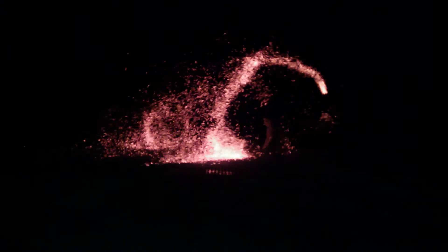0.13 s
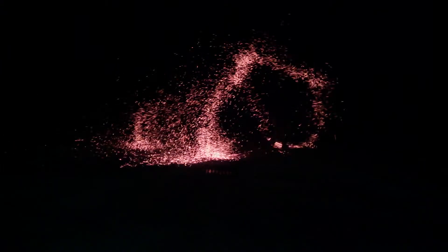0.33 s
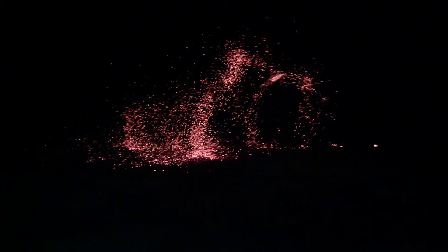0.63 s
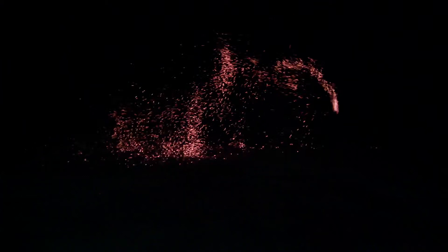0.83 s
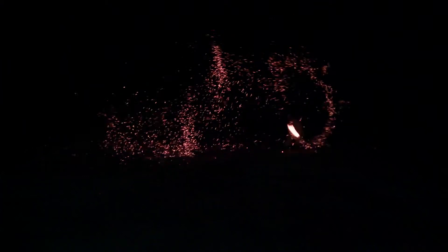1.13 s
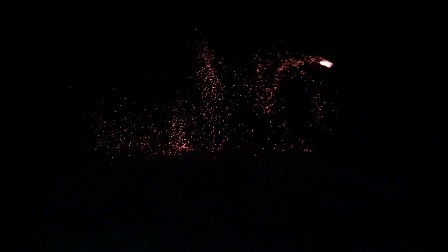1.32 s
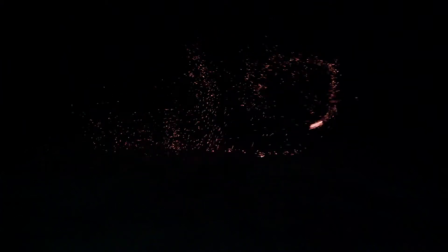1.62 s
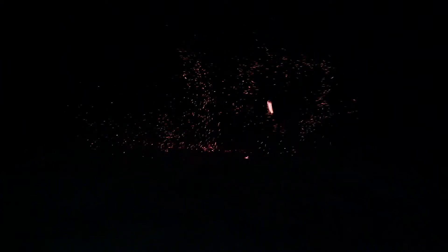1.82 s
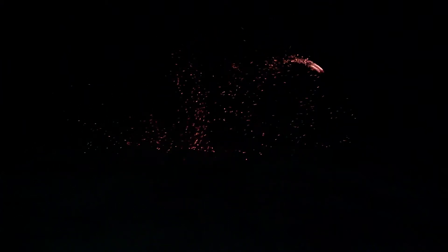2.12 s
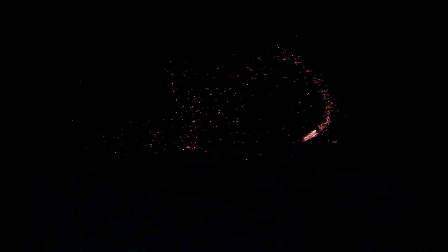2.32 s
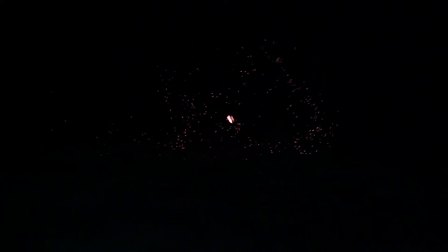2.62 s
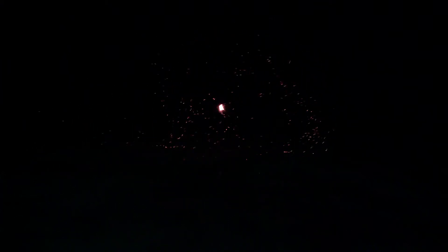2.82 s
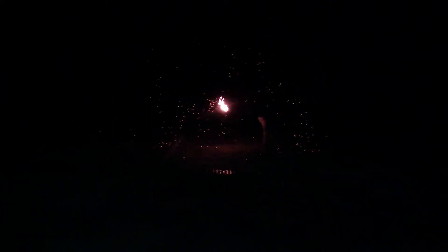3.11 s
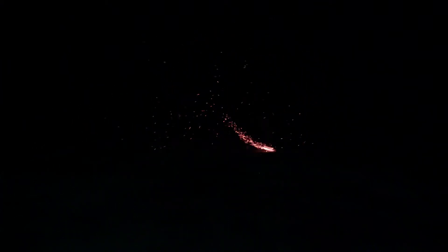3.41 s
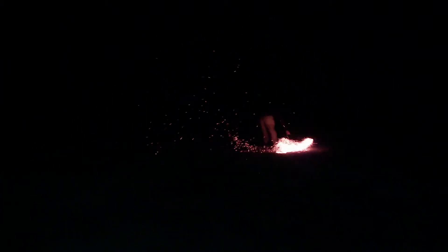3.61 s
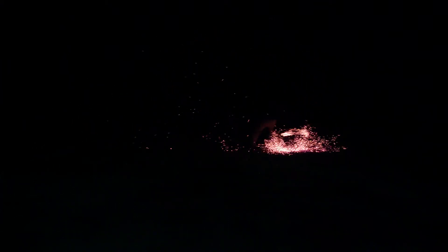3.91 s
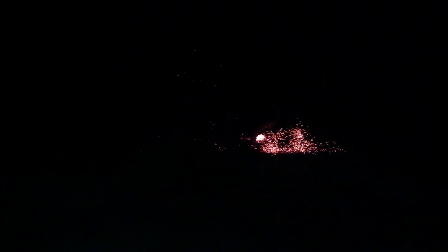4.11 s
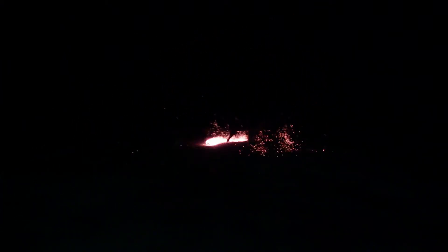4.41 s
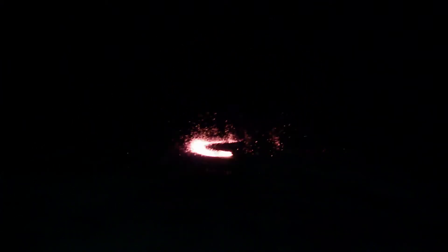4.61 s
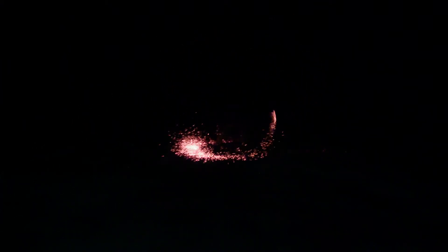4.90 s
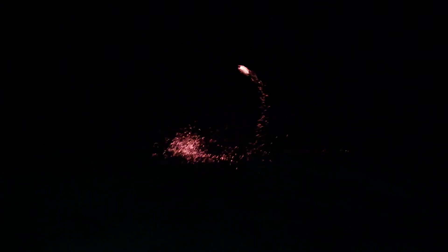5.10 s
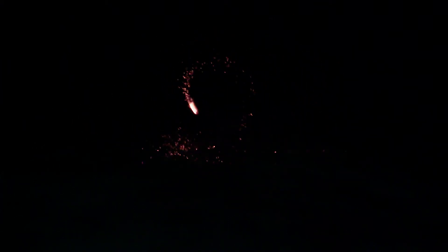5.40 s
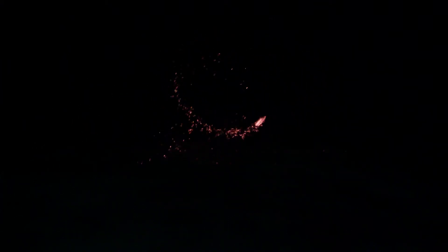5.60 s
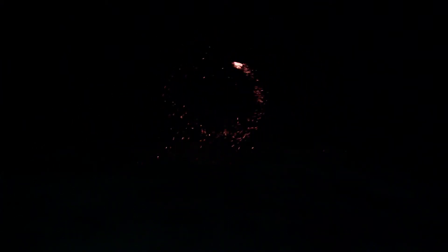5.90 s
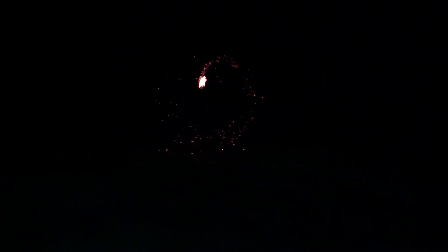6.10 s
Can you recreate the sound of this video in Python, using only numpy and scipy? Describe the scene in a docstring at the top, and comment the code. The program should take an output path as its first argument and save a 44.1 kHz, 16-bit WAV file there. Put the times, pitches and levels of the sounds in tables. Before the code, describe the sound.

A swung ember cage on a chain: fizzing sparks die away, bright chinks quicken, then hot crackle, harsh ground scrapes and loose snaps.

```python
"""Outdoors at night, a cage of burning embers is swung on a chain and dragged over the ground.
Links chink as short bursts of decaying tones, and metal slides as shaped streams of tiny impacts.
Embers hiss and snap, the cage scrapes through grit and shoes scuff the earth, all as short bursts.
Faint insects, a distant wash and a little wind are filtered noise in the background."""
import sys
import numpy as np
from scipy import signal
from scipy.io import wavfile
from scipy.ndimage import uniform_filter1d

SR = 44100
rng = np.random.default_rng(int(sys.argv[2]) if len(sys.argv) > 2 else 0)


def output_pcm(signal):
    """Save a mono or channel-first signal as 16-bit PCM at the path in sys.argv[1].

    Samples are clipped to [-1, 1] before scaling.
    """
    pcm = np.clip(np.atleast_2d(signal).T, -1, 1) * 32767
    wavfile.write(sys.argv[1], SR, np.round(pcm).astype(np.int16))


N = 277609
TIME = np.arange(N) / SR  # the clock [s]


# ringing tones of the small links, damped by their neighbours:
# (frequency [Hz], level [dB], time to fall by 60 dB [s])
LINK_TONES = [(5150, -4.5, 0.061), (6793, 7.5, 0.032), (6940, 12, 0.034), (7120, 6, 0.073),
              (7900, -26, 0.031), (12300, -13.5, 0.025), (14900, -17, 0.015)]
# colour of metal rubbing on metal: (frequency [Hz], level [dB per Hz])
STEEL_COLOUR = [(400, -34), (1500, -18.5), (1950, -9), (2400, -13.5), (2900, -13.5), (3400, -13),
                (3750, -21), (4200, -11), (5100, -1.5), (6000, -7), (7000, 1.5), (8700, 1), (10500, -1),
                (12200, 4), (13800, -5), (15500, 0)]
# jerks of the chain: (time [s], length [s], chink level [dB], main chink frequency [Hz],
# slide level of metal over metal [dB], before a 0.25 dB lift in the chain)
JERKS = [(0.056, .019, -41, 7130, -41), (0.098, .034, -35, 6960, -37.5), (0.204, .03, -27, 7070, -40.5),
         (0.317, 0.027, -36, 6800, -45), (0.44, 0.011, -27, 7150, -37.5),
         (0.581, 0.0084, -42.5, 6700, -45.5), (0.632, 0.0086, -37.5, 6730, -43),
         (0.671, 0.0067, -40, 7050, -50), (0.707, 0.059, -69, 7000, -46.5), (0.781, 0.018, -67, 7000, -49),
         (0.86, .026, -53, 7140, -53), (1.386, .002, -44, 6780, -73), (1.424, 0.014, -64, 7000, -54),
         (1.46, 0.023, -46, 6860, -37.5), (1.5, 0.022, -63, 7000, -42), (1.541, .007, -41, 7040, -41),
         (1.629, 0.0066, -59, 7000, -43.5), (1.678, 0.022, -42, 6800, -48.5),
         (1.751, .011, -33, 7270, -42.5), (1.769, 0.032, -55, 7000, -41.5), (1.843, 0.0067, -44, 7040, -54),
         (1.923, .036, -34, 6600, -35.5), (1.98, 0.01, -41.5, 7100, -39.5),
         (2.065, 0.0087, -41.5, 6860, -46), (2.095, 0.023, -52, 6950, -43.5),
         (2.131, 0.0073, -37.5, 6930, -44), (2.214, 0.038, -31, 7240, -41),
         (2.31, .006, -36.5, 7110, -42.5), (2.389, 0.032, -32.5, 7150, -36.5),
         (2.476, 0.0043, -31.5, 7100, -41), (2.539, 0.038, -34, 7300, -40), (2.623, 0.0069, -27, 7040, -41),
         (2.702, .009, -35, 6600, -45), (2.731, 0.012, -42, 6980, -35), (2.75, 0.0037, -24.5, 6950, -47),
         (2.765, 0.013, -35, 7050, -48), (2.798, 0.0086, -26, 7050, -39.5), (2.848, 0.0075, -42, 7000, -40),
         (2.879, 0.0062, -24.5, 7100, -36.5), (2.892, 0.021, -32, 6950, -41.5),
         (2.952, 0.027, -49, 7100, -43), (2.985, 0.011, -35, 7070, -49), (3.035, 0.037, -27, 7050, -35),
         (3.105, 0.0046, -25, 7100, -39.5), (3.12, 0.0058, -31, 6960, -40.5),
         (3.206, .05, -27, 7070, -33.5), (3.269, 0.0045, -22, 6860, -38), (3.287, 0.0032, -31, 7300, -58),
         (3.303, 0.0067, -31, 7100, -33.5), (3.324, .014, -35, 7030, -57), (3.382, 0.016, -34, 6700, -36),
         (3.403, .028, -29.5, 7160, -32), (3.471, 0.013, -28, 7000, -48), (3.53, 0.0095, -43, 6850, -57),
         (3.55, 0.0099, -33.5, 7080, -54), (3.575, 0.035, -36.5, 7260, -35),
         (3.641, 0.0079, -34.5, 6940, -38), (3.692, .035, -54, 7050, -49), (3.867, 0.036, -59, 7000, -50),
         (3.734, 0.028, -38.5, 7110, -35), (3.791, .004, -30.5, 7400, -41),
         (3.81, 0.0091, -34.5, 7300, -40), (3.934, 0.015, -36.5, 6700, -43),
         (3.958, 0.0058, -30.5, 6640, -49), (3.999, .004, -41.5, 6700, -52), (4.037, .004, -42, 6800, -50),
         (4.125, 0.056, -36.5, 7060, -38.5), (4.208, 0.02, -32, 6950, -37), (4.267, 0.012, -36, 7100, -41),
         (4.309, 0.052, -35.5, 7130, -34.5), (4.404, 0.022, -37.5, 7000, -39.5),
         (4.488, 0.045, -35, 7200, -39), (4.548, .01, -38.5, 7140, -38), (5.1, 0.0056, -58, 7000, -38.5),
         (5.197, .006, -60, 7000, -45.5), (5.277, 0.037, -71, 7000, -51.5), (5.323, 0.02, -48, 6800, -52),
         (5.341, 0.0048, -69, 7000, -47), (5.451, 0.11, -61, 6900, -58), (5.553, 0.025, -59, 6750, -41),
         (5.634, 0.027, -64, 7000, -55), (5.695, 0.0085, -52.5, 6890, -52)]
# direct strikes on the large rings: (time [s], length [s], level [dB], main frequency [Hz])
RING_STRIKES = [(0.105, .034, -36.5, 10000), (0.197, .033, -37, 9300), (0.638, .008, -40, 8500),
                (0.671, 0.0057, -37.5, 8970), (1.541, .007, -39.5, 8540), (2.799, 0.0074, -31, 8520),
                (3.041, 0.02, -32, 8540), (3.106, .004, -33.5, 10010), (3.209, 0.061, -38, 8980),
                (3.306, .007, -31.5, 8700), (3.393, 0.031, -28.5, 8420), (3.547, 0.012, -36, 10100),
                (3.745, 0.015, -31, 9850), (3.803, 0.02, -43.5, 9030), (3.956, 0.0061, -34.5, 9400),
                (4.13, 0.026, -37, 9800), (4.264, 0.012, -28, 8530), (4.306, 0.056, -38, 9800),
                (4.495, 0.03, -36.5, 8980), (4.544, 0.011, -37.5, 9880)]


def chain():
    """Each jerk rattles the small links, stirs the large rings and drags metal over metal."""
    out = np.zeros(N)
    for start, length, db, hz, _ in JERKS:
        chink = jingle(length, LINK_TONES, hz, favour_db=8, contacts_per_s=300, detune=0.009)
        add(out, start, amp(db) * chink)
        # the rings sound 19 dB below the chink
        add(out, start, amp(db - 19) * rings(length, RING_TONES[0][0]))
    for start, length, db, hz in RING_STRIKES:
        add(out, start, amp(db) * rings(length, hz))
    start, length, *_, slide_db = np.transpose(JERKS)
    # the chain slides on 8.1 ms after the links have met, then the last links settle
    slide = strokes(start, length + 0.0081, slide_db + 0.25, fall=0.026, tail_db=-16, tail=0.04)
    rubbing = patchy(grains(per_s=16000, spread_db=2.0), depth_db=3.0)
    rubbing = rubbing * flutter(rate=220, depth_db=3.0)
    return out + colour(slide * rubbing, STEEL_COLOUR)


# ringing tones of the large rings, which hang freer:
# (frequency [Hz], level [dB], time to fall by 60 dB [s])
RING_TONES = [(8533, -5, 0.11), (9010, 1.5, 0.049), (9750, -8, 0.07), (10040, -0.5, 0.067),
              (10220, -5.5, 0.035)]


def rings(length, main_hz):
    """The large rings meet less often than the links and almost keep their pitch."""
    return jingle(length, RING_TONES, main_hz, favour_db=10, contacts_per_s=140, detune=0.0016)


# hardest knocks of the chain: (time [s], peak level of the ping's envelope [dB], frequency [Hz])
CLACKS = [(.2065, -24, 7200), (.675, -31, 7100), (1.544, -22, 6950), (2.8058, -19, 6840),
          (3.2679, -9.5, 6610)]


def clacks(swell=0.00066, spray_db=-11, spray_fall=0.0012):
    """The chain snaps taut: steel meets steel in one hard, very short ping with a bright edge."""
    pings, spray = np.zeros(N), np.zeros(N)
    t = np.arange(SR // 100) / SR
    for start, db, hz in CLACKS:
        envelope = t / swell * np.exp(1 - t / swell)  # reaches its peak of 1 at swell [s]
        add(pings, start, amp(db) * envelope * np.sin(2 * np.pi * hz * t))
        edge = np.exp(-t / spray_fall) * rng.standard_normal(len(t))
        add(spray, start, amp(db + spray_db) * edge)
    return pings + colour(spray, STEEL_COLOUR)


# ringing tones of the cage: (frequency [Hz], level [dB], time to fall by 60 dB [s])
CAGE_TONES = [(1895, -4.5, 0.16), (2030, -5, 0.048), (2270, 0, 0.053), (2947, -9, 0.056),
              (5450, 11.5, 0.04), (5330, -7.5, 0.023)]
# the cage swings hard against its chain: (time [s], length [s], level [dB])
CLATTERS = [(1.425, 0.018, -50), (1.463, 0.005, -39.5), (1.5, 0.047, -53.5), (1.78, 0.05, -50),
            (3.212, 0.018, -48)]


def cage():
    """The cage knocks against its chain: lightly at every jerk, now and then on its own account."""
    out = np.zeros(N)
    # light knocks lie 22 dB below the listed slide level
    light = [(start, length, slide_db - 22) for start, length, *_, slide_db in JERKS]
    for start, length, db in list(CLATTERS) + light:
        knock = jingle(length, CAGE_TONES, 0, 0, contacts_per_s=320, detune=0.02)
        add(out, start, amp(db) * knock)
    return out


# colour of the sparks: (frequency [Hz], level [dB per Hz])
SPARK_COLOUR = [(470, -55), (800, -35), (953, -23), (1080, -29), (1700, -17.5), (2910, -7), (4990, 0.5),
                (5510, -3.5), (6910, 2.5), (12000, 0.5), (16000, -2)]


def shower():
    """Sparks fizz as a dense stream of tiny impacts that holds, then burns out."""
    start_db, hold_s, fade_db_per_s, last_db = -38.5, 0.25, 38.5, -82.5
    fade_db = start_db - fade_db_per_s * np.maximum(TIME - hold_s, 0)
    fizz = patchy(grains(per_s=8700, spread_db=4.5), depth_db=-0.5)
    fizz = fizz * flutter(rate=120, depth_db=3.5)
    return colour(amp(np.maximum(fade_db, last_db)) * fizz, SPARK_COLOUR)


# the coals as the swing and the ground stir them: (time [s], level [dB]),
# before the crackle's lift of 3 dB and the stray sparks' cut of 8.5 dB
COALS = [(0.0, -51.5), (0.33, -55), (0.46, -65), (1.3, -78.5), (1.47, -82), (1.66, -60), (2.26, -70),
         (3.35, -74), (3.66, -57), (3.9, -65.5), (4.17, -65.5), (4.29, -54), (4.48, -50), (5.75, -67.5),
         (5.9, -85.5), (6.29, -69)]
# grit rattling in the cage; also colours the coals and splinters: (frequency [Hz], level [dB per Hz])
GRIT_COLOUR = [(150, -50), (500, -25), (1150, -10), (1400, -3.5), (1750, -10), (2100, -3), (2450, -0.5),
               (2900, 3), (3600, -0.5), (4500, 0.5), (6000, -3.5), (9000, -11), (16000, -22)]


def coals():
    """Fanned coals crackle as sparser impacts; a few stray sparks tick along with them."""
    crackle = patchy(grains(per_s=2500, spread_db=3.8), depth_db=2.6)
    crackle = crackle * flutter(rate=70, depth_db=1.8)
    rush = amp(3) * level(COALS) * crackle
    # a faint floor keeps the stray sparks going when the coals are quiet
    strays = (amp(-84.5) + amp(-8.5) * level(COALS)) * grains(per_s=45, spread_db=3)
    return colour(rush, GRIT_COLOUR) + colour(strays, SPARK_COLOUR)


# embers bursting: (time [s], level [dB], centre frequency [Hz]); the crack peaks 2 dB above this level
SNAPS = [(0.4525, -24, 7200), (0.4806, -14, 10400), (0.7502, -20, 6170), (1.049, -37.5, 5900),
         (1.1393, -44, 5790), (1.259, -46, 6100), (4.0819, -30.5, 6800), (4.5734, -38, 3110),
         (4.804, -46, 4350), (4.814, -37, 3270), (4.8703, -33, 3170), (4.9152, -40, 4290),
         (5.1034, -14, 7400), (5.1416, -32, 6670), (5.1941, -26.5, 3930), (5.669, -32.5, 5040),
         (5.8175, -34, 5800)]


def snaps(cycles=0.6, splinter_db=-14, splinter_fall=0.0019):
    """An ember bursts: a pulse of about one cycle, then a short spray of splinters."""
    cracks, spray = np.zeros(N), np.zeros(N)
    t = np.arange(SR // 40) / SR
    for start, db, hz in SNAPS:
        push = np.sin(2 * np.pi * hz * t) * np.exp(-t * hz / cycles)
        pulse = np.diff(push, prepend=0)  # moves no net air
        add(cracks, start, amp(db + 2.0) * pulse / abs(pulse).max())
        splinters = np.exp(-t / splinter_fall) * rng.standard_normal(len(t))
        add(spray, start, amp(db + splinter_db) * splinters)
    return cracks + colour(spray, GRIT_COLOUR)


# the cage scrapes the ground: (time [s], length [s], grit level [dB] before a 1.2 dB lift of the stones,
# resonance [Hz], metal rasp level [dB])
SCRAPES = [(1.458, 0.029, -48.5, 3060, -53), (1.79, 0.064, -51.5, 1930, -61),
           (3.558, 0.003, -24.5, 3450, -29), (4.126, 0.0057, -39.5, 1430, -43),
           (4.272, 0.014, -54, 1390, -43), (4.306, 0.012, -41, 2620, -47), (4.347, 0.0065, -33, 4500, -42),
           (4.39, 0.018, -37.5, 3160, -34), (4.417, .011, -40, 5140, -43), (4.444, 0.013, -38, 4430, -21.5),
           (4.478, 0.0083, -31, 4340, -18.5), (4.599, 0.016, -31, 4690, -34),
           (4.633, 0.0051, -41.5, 4530, -44), (4.654, 0.0093, -37, 4230, -35.5),
           (4.803, 0.0021, -38, 4070, -48), (4.959, 0.018, -44, 5030, -73)]


def ground():
    """The dragged cage grinds grit, rasps and stirs the earth."""
    start, length, db, hz, rasp_db = np.transpose(SCRAPES)
    stones = accent(grit(), start, hz, width_hz=200, boost_db=1)
    stones = stones * strokes(start, length, db + 1.2, fall=0.0054, tail_db=-44, tail=0.019)
    rasp = colour(patchy(grains(per_s=13000, spread_db=-0.5), depth_db=5), STEEL_COLOUR)
    rasp = rasp * strokes(start, length, rasp_db, fall=0.0033, tail_db=-17, tail=0.016)
    # the earth lies 17 dB below the listed grit level and resonates at 1370 Hz
    stirred = earth(start, length, db - 17, np.full(len(start), 1370))
    return stones + rasp + stirred


def grit():
    """Small stones grinding together: a shifting stream of tiny impacts."""
    stones = patchy(grains(per_s=5100, spread_db=3.0), depth_db=4)
    return unit(colour(stones, GRIT_COLOUR))


# colour of scuffed earth: (frequency [Hz], level [dB per Hz])
EARTH_COLOUR = [(60, -44), (200, -37.5), (330, -13), (520, 3.5), (650, 1.5), (950, 4), (1180, -6),
                (1420, 4), (1700, -15), (5000, -22)]


def earth(start, length, db, hz):
    """Strokes through soft earth, each with a hollow resonance."""
    noise = colour(rng.standard_normal(N), EARTH_COLOUR)
    noise = accent(noise, start, hz, width_hz=93, boost_db=9)
    return noise * strokes(start, length, db, fall=0.006, tail_db=-8.0, tail=0.063)


# feet scuff the earth: (time [s], length [s], level [dB], resonance [Hz])
SCUFFS = [(0.233, 0.016, -51, 860), (0.405, 0.049, -56.5, 430), (0.963, 0.041, -51, 645),
          (1.246, 0.0079, -52, 950), (1.638, 0.017, -49.5, 990), (1.781, 0.11, -55, 690),
          (2.468, 0.039, -52, 1000), (2.528, 0.1, -58, 474), (2.801, 0.025, -43, 890),
          (3.47, 0.018, -43.5, 980), (4.276, 0.03, -45, 1350), (4.344, .009, -42, 1340),
          (4.948, 0.024, -47, 706), (6.27, .029, -53, 1000)]


def scuffs():
    """Shoes rub over earth and a little grit, which lies 7 dB below the earth."""
    start, length, db, hz = np.transpose(SCUFFS)
    stones = grit() * strokes(start, length, db - 7, fall=0.005, tail_db=-24, tail=0.02)
    return earth(start, length, db, hz) + stones


# dull footfalls: (time [s], level [dB], length [s])
STEPS = [(0.834, -44.5, 0.0083), (0.93, -59, 0.021)]
# colour of a sole landing: (frequency [Hz], level [dB per Hz])
SOLE_COLOUR = [(30, -24), (90, 2), (150, 0), (240, -3), (340, 2), (580, -1.5), (800, -18), (2000, -25)]


def footfalls():
    """Shoes land dully: short strokes of low noise."""
    start, db, length = np.transpose(STEPS)
    envelope = strokes(start, length, db, fall=0.0076, tail_db=-7, tail=0.048)
    return colour(envelope * rng.standard_normal(N), SOLE_COLOUR)


# colour of insect song: (frequency [Hz], level [dB per Hz])
INSECT_COLOUR = [(4800, -28), (5450, -11.5), (5700, -9), (5860, -0.5), (6020, -3.5), (6200, -29),
                 (7000, -30)]


def insects():
    """A steady, faint chorus: a narrow band of noise that trembles quickly."""
    trill = colour(rng.standard_normal(N), INSECT_COLOUR)
    return amp(-65.5) * trill * flutter(rate=68, depth_db=-0.6)


# the distant wash rises and falls: (time [s], level [dB])
WASH = [(0, -59), (.85, -63), (1.35, -58.5), (3.3, -61), (4.1, -60.5), (4.5, -57), (5.2, -57.5), (5.8, -63),
        (6.29, -61.5)]
# colour of the distant wash: (frequency [Hz], level [dB per Hz])
WASH_COLOUR = [(30, -27), (160, -9), (270, -14.5), (420, -9.5), (600, -1.5), (840, -2), (980, 4),
               (1170, -6), (1450, -7), (2200, -12.5), (4000, -35), (8000, -26), (12500, -48), (16000, -27)]


def distant_wash():
    """A far-off wash: noise whose colour and level drift."""
    noise = patchy(rng.standard_normal(N), depth_db=3.5, size=2048)
    return level(WASH) * colour(noise, WASH_COLOUR)


# gusts on the microphone: (time of the peak [s], level [dB]), added to a faint steady wind
GUSTS = [(0.16, -60.5), (0.6, -69), (0.86, -69), (1.05, -68.5), (1.35, -70)]
# colour of the wind: (frequency [Hz], level [dB per Hz])
GUST_COLOUR = [(20, -4), (45, 3), (80, 9), (130, -3.5), (250, -20), (500, -31.5)]


def wind():
    """A few soft gusts of low noise before the air calms."""
    width_s, calm_db = 0.11, -82
    strength = amp(calm_db)
    for peak, db in GUSTS:
        strength = strength + amp(db) * np.exp(-((TIME - peak) / width_s) ** 2)
    return strength * colour(rng.standard_normal(N), GUST_COLOUR) * flutter(rate=12, depth_db=0.5)


def outdoors(x, echo_db=-16):
    """Ground and nearby things scatter back a thin, short tail."""
    t = np.arange(SR // 2) / SR
    fade = amp(-60 * t / 0.3)  # falls by 60 dB in 0.3 s
    sparse = rng.random(len(t)) < 3000 / SR
    taps = rng.standard_normal(len(t)) * sparse * (t > 0.004) * fade
    return x + amp(echo_db) * signal.oaconvolve(x, taps / np.linalg.norm(taps))[:N]


def amp(db):
    """Turns decibels into a gain."""
    return 10 ** (np.asarray(db) / 20)


def unit(x):
    """Scales a sound to an average (rms) strength of 1."""
    return x / np.sqrt(np.mean(x ** 2) + 1e-20)


def level(curve):
    """Turns a curve of (time [s], level [dB]) into a gain at every sample."""
    return amp(np.interp(TIME, *np.transpose(curve)))


def add(mix, start, sound):
    """Mixes a sound in at its start time [s]."""
    part = mix[max(round(start * SR), 0):][:len(sound)]
    part += sound[:len(part)]


def colour(x, points, size=4096):
    """Shapes a sound's spectrum with a filter of unit energy that never sounds ahead of time."""
    hz, db = np.transpose(points)
    f = np.log(abs(np.fft.fftfreq(size, 1 / SR)) + 1)
    log_gain = np.log(amp(np.interp(f, np.log(hz + 1), db)))
    # minimum phase: the filter answers as promptly as its spectrum allows
    taps = np.fft.ifft(np.exp(np.conj(signal.hilbert(log_gain)))).real[:size // 2]
    return signal.oaconvolve(x, taps / np.linalg.norm(taps))[:N]


def flutter(rate, depth_db):
    """A gain that wanders at random, with a new target rate times a second."""
    knots = rng.standard_normal(N)
    return amp(depth_db * np.interp(TIME * rate, np.arange(N), knots))


def grains(per_s, spread_db):
    """Random tiny impacts of uneven strength; a positive spread makes a few much stronger."""
    size = amp(spread_db * np.minimum(rng.exponential(1, N), 5))
    happens = rng.random(N) < per_s / SR
    return unit(size * rng.choice([-1, 1], N) * happens)


def strokes(starts, lengths, dbs, fall, tail_db, tail):
    """Loudness of strokes that set in almost at once, hold, drop and trail off."""
    power, t = np.zeros(N), np.arange(SR // 3) / SR
    for start, length, db in zip(starts, lengths, dbs):
        after = np.maximum(t - length, 0)
        onset = np.minimum(t / 0.00058, 1)
        release = np.exp(-after / fall) + amp(tail_db) * np.exp(-after / tail)
        shape = onset * release / (1 + amp(tail_db))
        add(power, start, (amp(db) * shape) ** 2)
    return np.sqrt(power)


def jingle(length, modes, main_hz, favour_db, contacts_per_s, detune, count=32):
    """Metal parts knock in quick succession, each a little off pitch; about rms 1 over the burst."""
    t, out = np.arange(SR // 8) / SR, np.zeros(SR // 4)
    place, size = rng.random(count), rng.standard_normal(count)
    pitch = rng.standard_normal((count, len(modes)))
    place[0], size[0] = 0, 0.5  # the first knock is prompt and firm
    hz, db, t60 = np.transpose(modes)
    # the point of contact favours the tones near main_hz
    db = db + favour_db * np.exp(-((hz - main_hz) / 170) ** 2)
    decay = amp(db[:, None] - 60 * t / t60[:, None]) * (1 - np.exp(-t / 0.0014))
    hits = int(np.clip(round(length * contacts_per_s), 1, count))
    for k in range(hits):
        turns = (hz * (1 + detune * pitch[k]))[:, None] * t
        ring = (decay * np.sin((2 * np.pi * turns).astype(np.float32))).sum(0)
        add(out, length * (k + place[k]) / hits, amp(2 * size[k]) * ring)
    # the chain pulls taut again and chokes the ring
    slack = np.maximum(np.arange(len(out)) / SR - length, 0)
    out = out * (0.45 + 0.5 * np.exp(-slack / 0.00194))
    return out / np.sqrt(np.sum(out ** 2) / ((length + 0.0016) * SR))


def patchy(x, depth_db, size=512):
    """Makes a sound's colour shift at random from moment to moment."""
    overlap = size * 3 // 4
    z = signal.stft(x, nperseg=size, noverlap=overlap)[2]
    patches = rng.standard_normal(z.shape)
    patches = uniform_filter1d(patches, size=4, axis=0)  # smooth over frequency
    patches = unit(uniform_filter1d(patches, size=7, axis=1))  # smooth over time
    z = z * unit(amp(depth_db * patches))
    return signal.istft(z, nperseg=size, noverlap=overlap)[1][:N]


def accent(x, starts, hz, width_hz, boost_db):
    """Gives each stroke a resonance of its own; rms 1."""
    # each resonance is in place 3 ms before its stroke
    stroke = np.maximum(np.searchsorted(np.sort(starts), TIME + 0.003) - 1, 0)
    turn = np.exp(2j * np.pi * np.cumsum(hz[stroke]) / SR)
    r = np.exp(-np.pi * width_hz / SR)
    # shift the resonance down to zero frequency, smooth there, and shift it back
    resonance = 2 * (turn * signal.lfilter([1 - r], [1, -r], x / turn)).real
    return unit(x + amp(boost_db) * resonance)


def scene():
    """Chain, cage, fire, ground and feet, with their echo, in the open night."""
    metal = chain() + clacks() + cage()
    fire = shower() + coals() + snaps()
    earthy = ground() + scuffs() + footfalls()
    background = insects() + distant_wash() + wind()
    return (outdoors(metal + fire + earthy) + background)[None]


def record(dry):
    """The recorder's band limit: the treble above 15850 Hz is cut off."""
    taps = signal.firwin(401, 15850, window=("kaiser", 8), fs=SR)
    return signal.oaconvolve(dry, taps[None], "same")


dry = scene()
out = record(dry)
output_pcm(out)
```